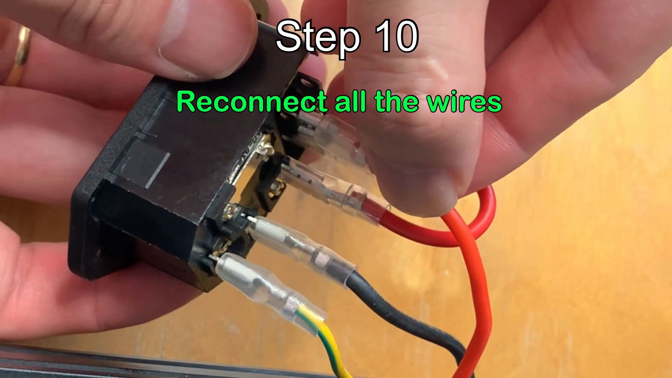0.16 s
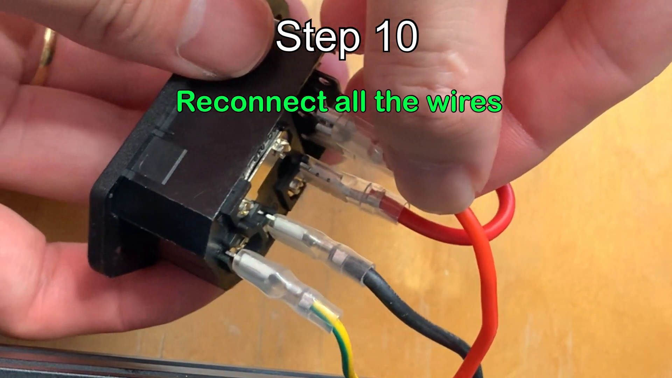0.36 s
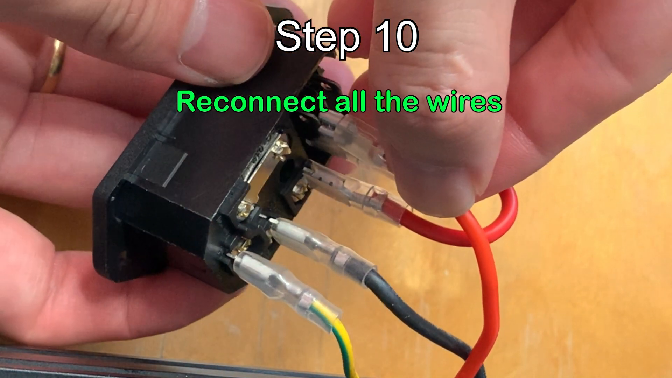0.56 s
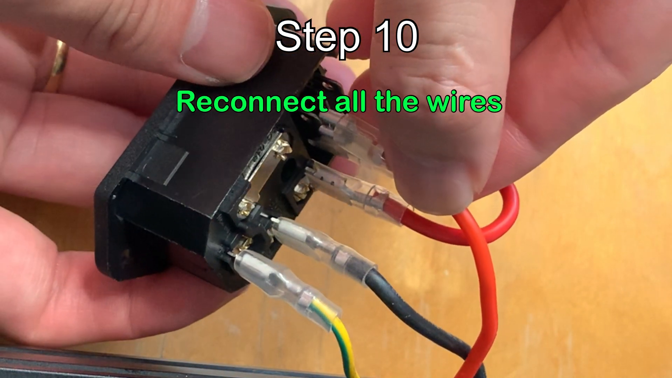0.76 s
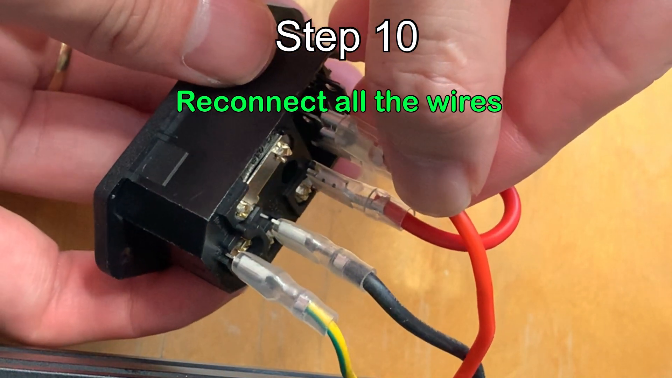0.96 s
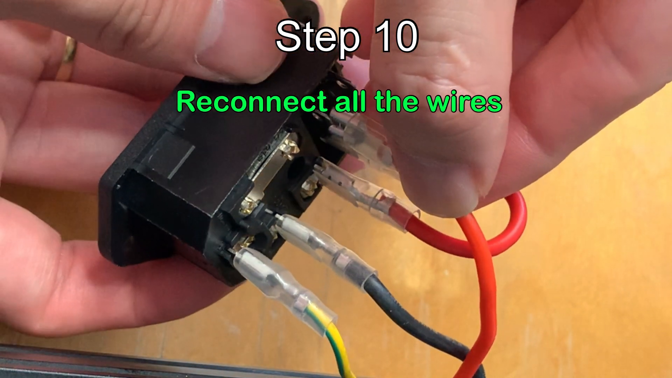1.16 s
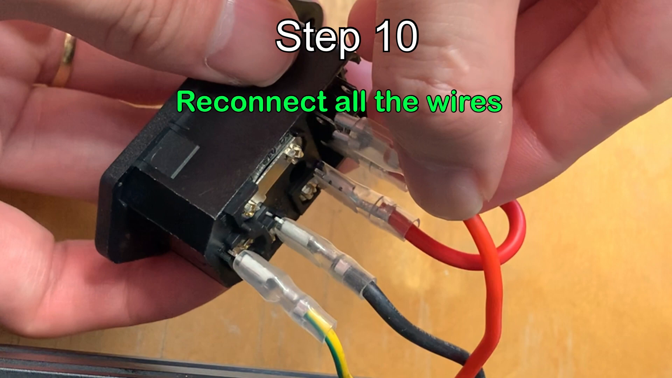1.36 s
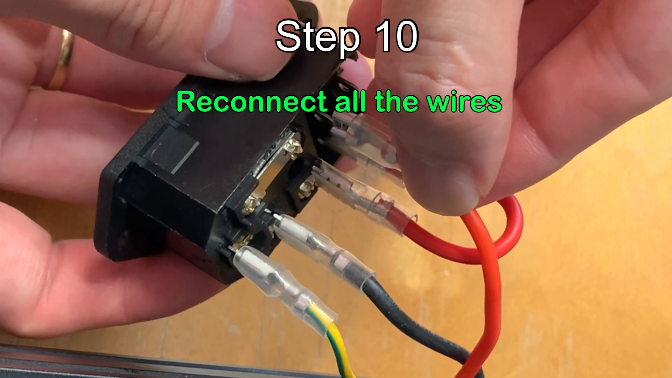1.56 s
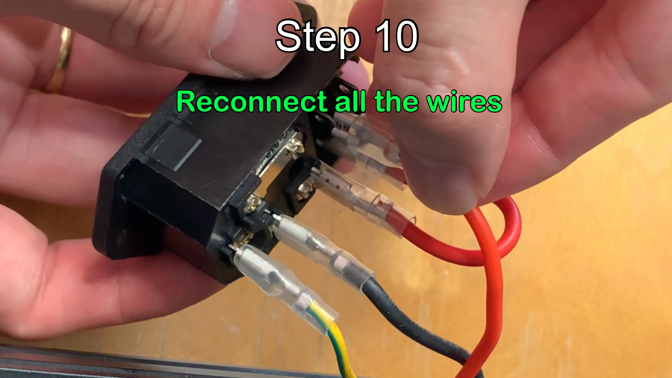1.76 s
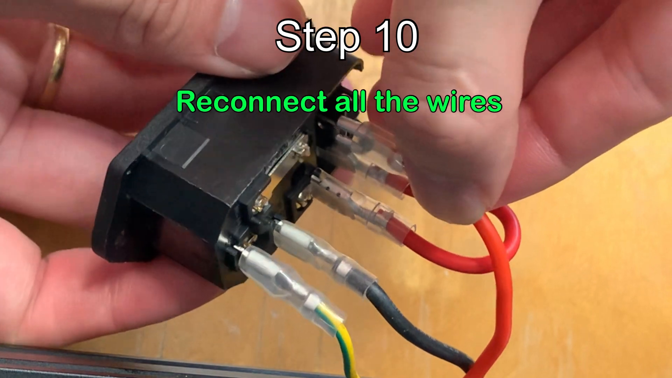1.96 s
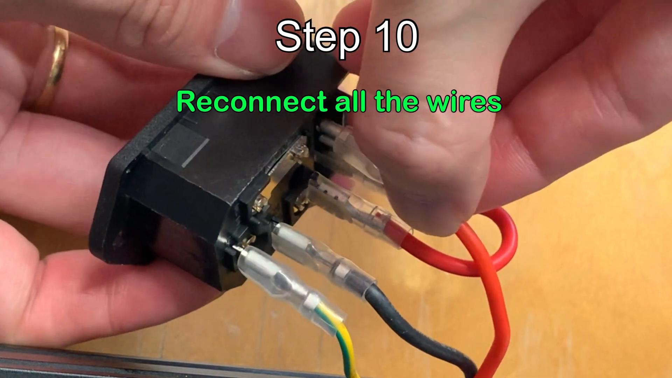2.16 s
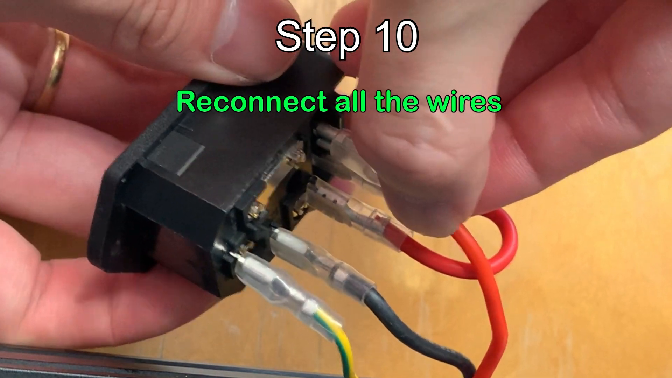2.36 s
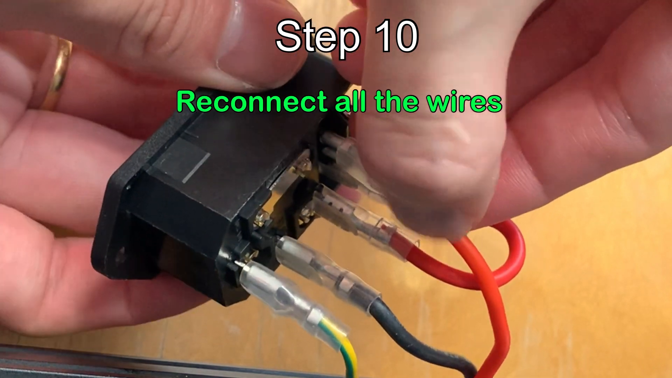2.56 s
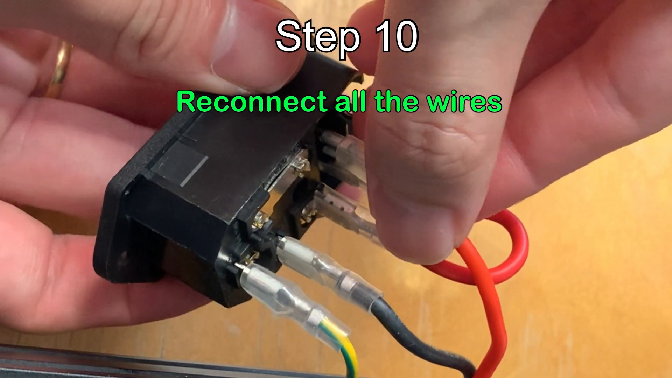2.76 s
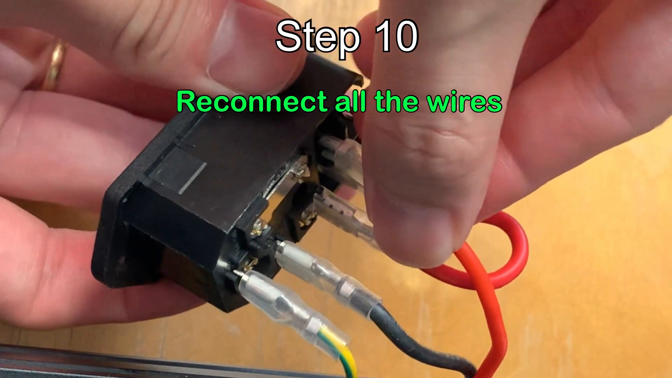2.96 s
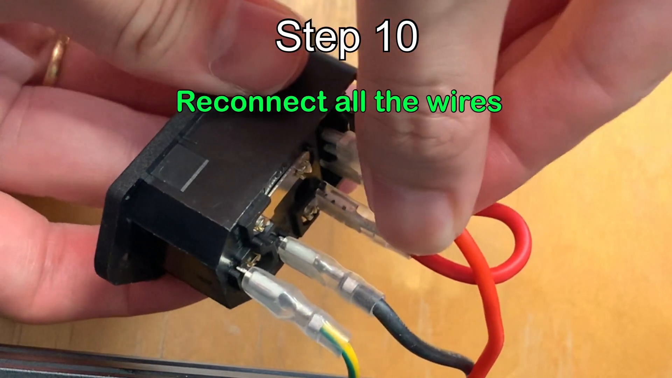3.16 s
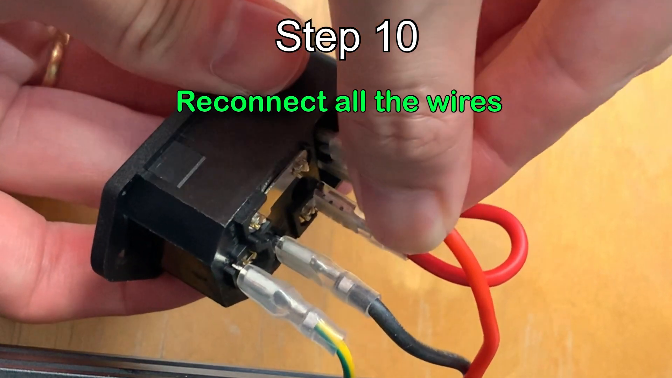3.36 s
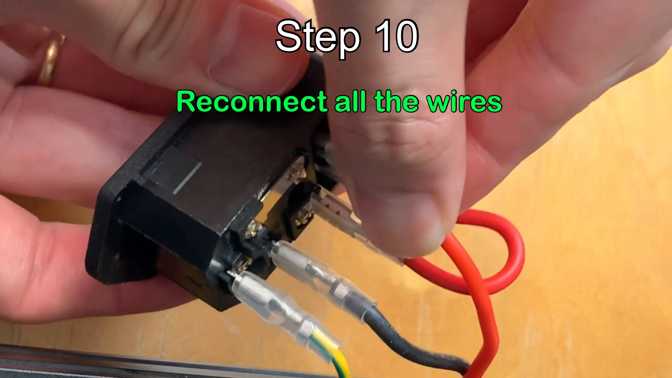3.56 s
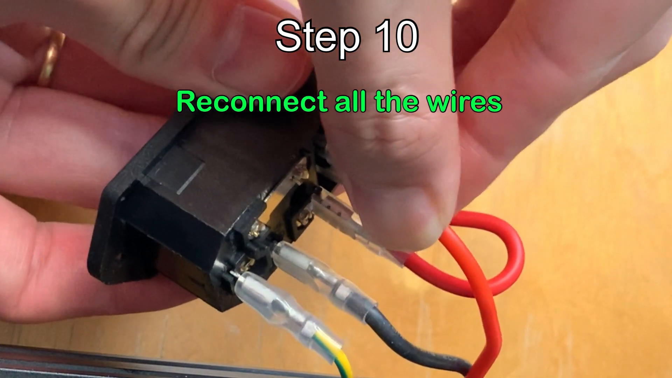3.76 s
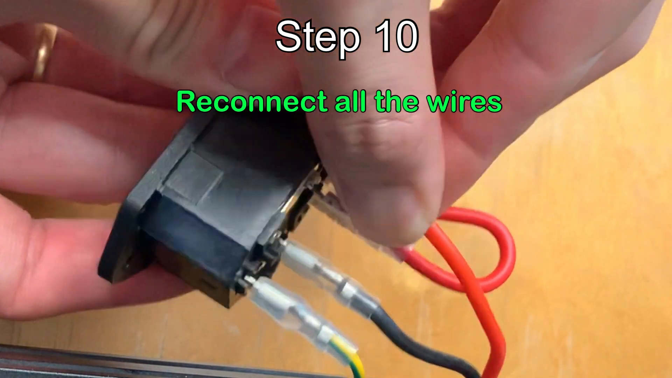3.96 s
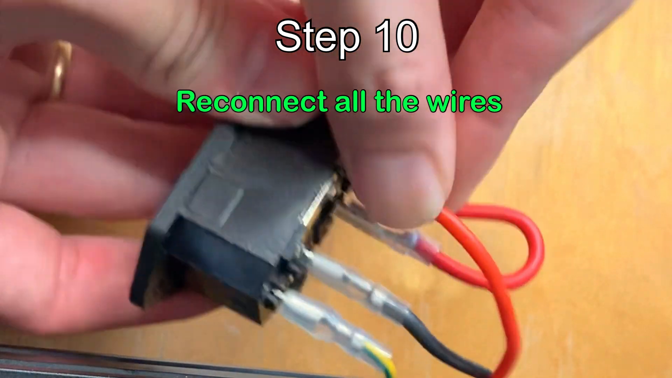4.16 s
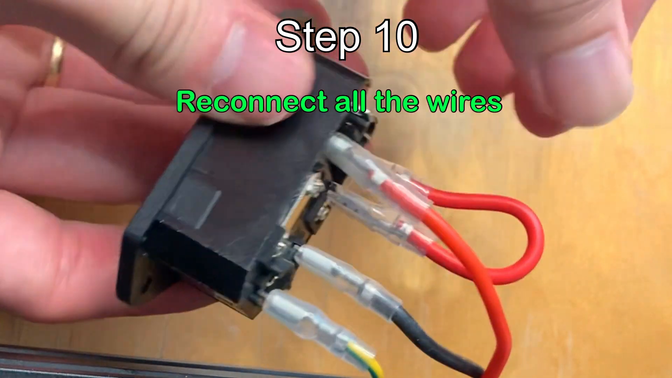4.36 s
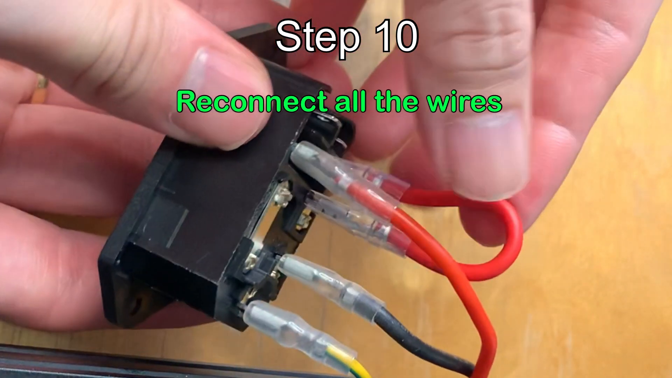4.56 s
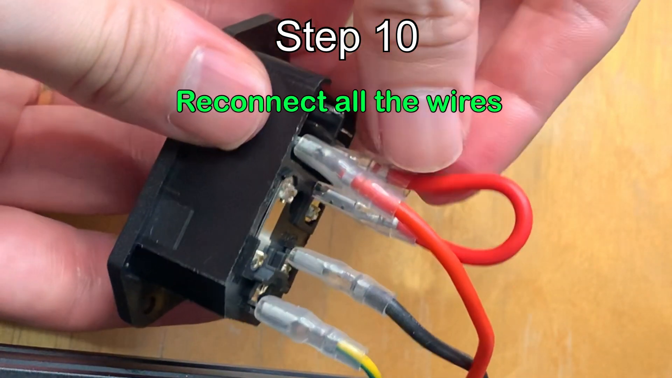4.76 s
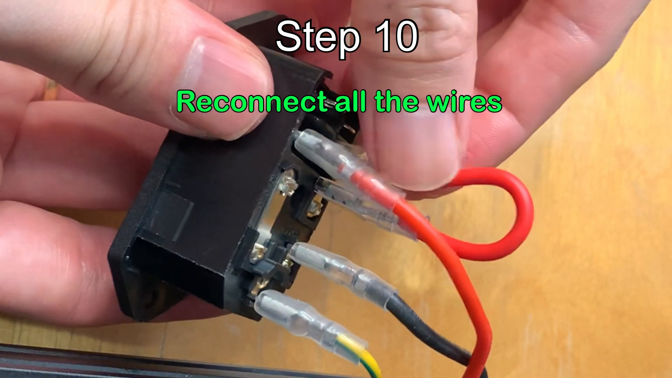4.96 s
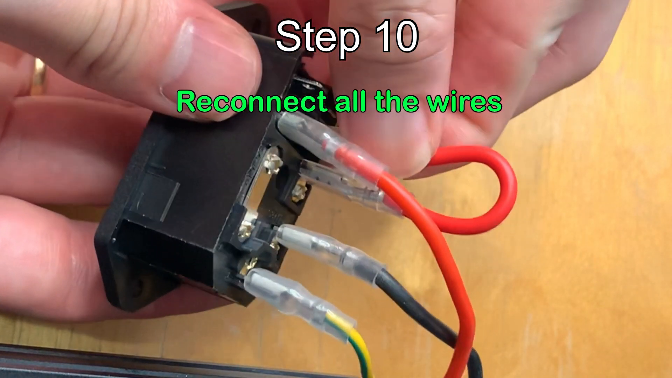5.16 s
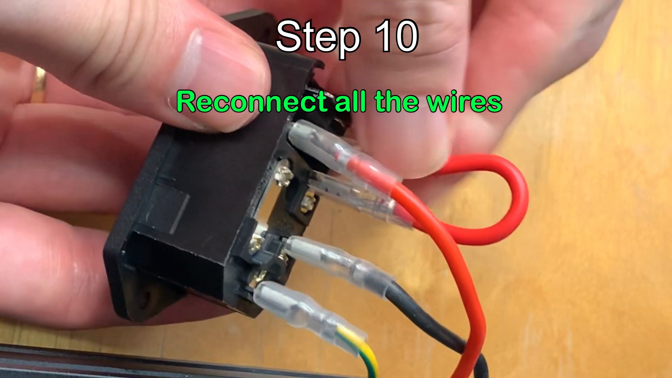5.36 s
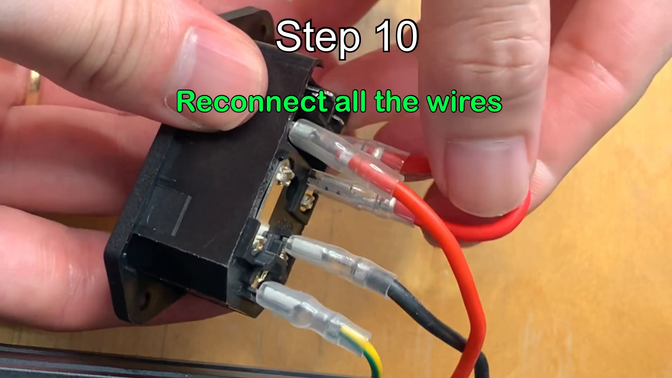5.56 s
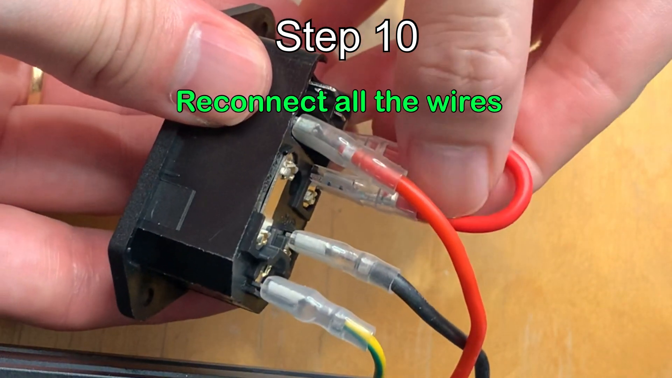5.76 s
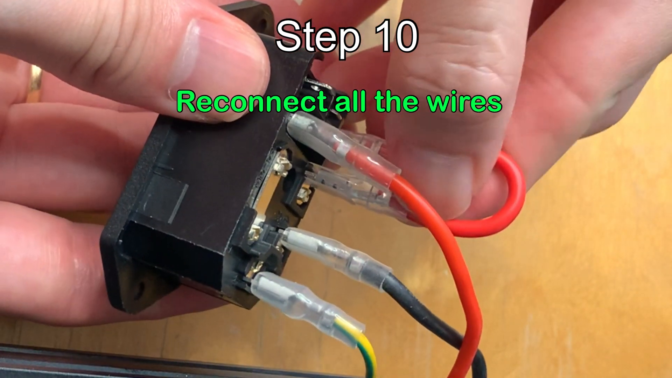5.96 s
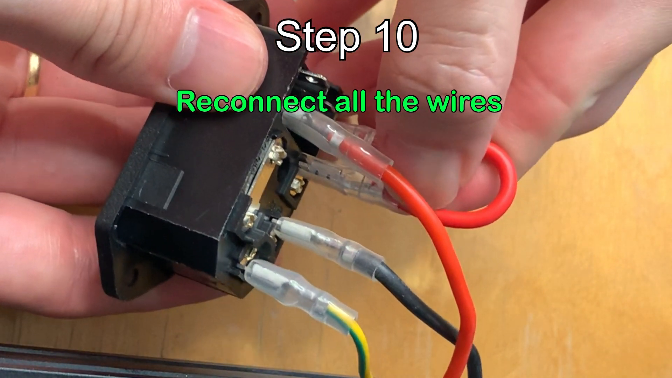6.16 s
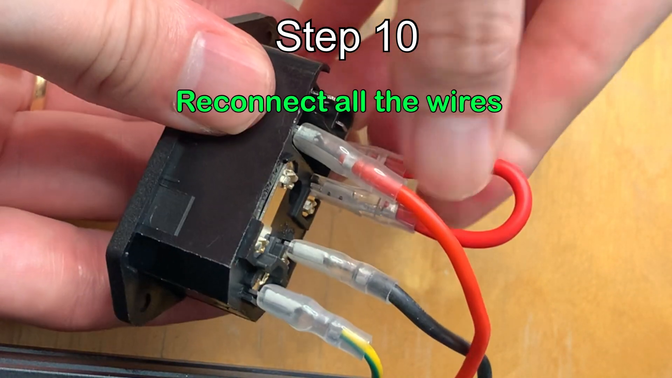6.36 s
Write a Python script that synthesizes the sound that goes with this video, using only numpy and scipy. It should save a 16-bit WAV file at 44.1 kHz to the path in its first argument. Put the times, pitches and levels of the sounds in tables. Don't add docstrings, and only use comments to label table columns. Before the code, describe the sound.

Throughout about 6.5 seconds, a fan and compressor drone low and steady in a small room, wavering slightly, with soft rushing air. Close to the stereo microphones, fingers work metal connectors onto a plastic socket. Barely audible dull knocks come at 0.35 and 1.15 seconds. A crisp small click sounds at 1.87, another with a slight scrape at 2.0, then a metallic tick at 2.93 and a faint plastic one at 3.35. At about 3.88 a connector springs over its catch: one very loud, hard, bright snap, a rattle too quick to separate, ringing metal and plastic with a short room tail. Small ticks follow at 4.1 to 4.6, with soft skin rubbing around 4.75. A tight cluster of plastic and metal taps comes at 5.3, a tick at 5.41, then a light metallic click at 5.83 and faint rubs and ticks to the end.

```python
import sys
import numpy as np
from scipy import signal
from scipy.fft import rfft, irfft, next_fast_len
from scipy.io import wavfile
from scipy.ndimage import uniform_filter1d

SR = 44100
rng = np.random.default_rng(int(sys.argv[2]) if len(sys.argv) > 2 else 0)


def log_audio(samples):
    frames = np.atleast_2d(samples).T
    limited = np.clip(frames, -1, 1)
    pcm = np.round(limited * 32767).astype(np.int16)
    wavfile.write(sys.argv[1], SR, pcm)


def field_ratio(decibels):
    return 10 ** (np.asarray(decibels, dtype=float) / 20)


N = 281799
M = next_fast_len(N)
HZ = np.arange(M // 2 + 1) * SR / M + 1e-3

# hz, likeness (0-1), left_minus_right_db
PORTS = [(60, 1, 0), (169, 0.94, -1), (287, .8, -2.5), (605, 0.15, -2), (1000, 0.03, 0), (2420, .5, -.5),
         (4500, 0.94, 0), (6980, 0.98, 2)]


def read(table, column=1):
    table = np.array(table)
    return np.interp(np.log(HZ), np.log(table[:, 0]), table[:, column])


def walk(rate):
    hold = int(SR / rate)
    steps = np.repeat(rng.standard_normal(N // hold + 1), hold)
    return 1.3 * uniform_filter1d(uniform_filter1d(steps, hold), hold)[:N]


def fade(t60, length_s=.05):
    t = np.arange(int(length_s * SR)) / SR
    return t, np.exp(-np.log(1000) * t / t60)


def bandpass(x, low_hz, high_hz, order=2):
    return signal.sosfilt(signal.butter(order, [low_hz, high_hz], "band", fs=SR, output="sos"), x)


def crack(t60, low_hz, top_hz):
    t, decay = fade(t60)
    burst = bandpass(decay * rng.standard_normal(len(t)), low_hz, top_hz, order=4)
    return burst / np.sqrt(np.sum(burst ** 2) / (.004 * SR))


def pan(x, db):
    return np.array([x * field_ratio(db / 2), x * field_ratio(-db / 2)])


def both(shared, left, right):
    return shared + .25 * np.array([left, right])


def pair(shared, left, right):
    share = np.clip(read(PORTS), 0, 1)
    return np.sqrt(share) * shared + np.sqrt(1 - share) * np.array([left, right])


def add(out, x, start_s):
    i = int(start_s * SR)
    out[:, i:i + x.shape[1]] += x[:, :N - i]


def snap():
    # start_s, metal_db, socket_db
    blows = [(3.8740, -32.5, -40), (3.8747, -25, -32), (3.8757, -14, -22), (3.8761, -8, -14),
             (3.8766, -4, -3.5), (3.8780, -16, -25), (3.8790, -15, -22), (3.8799, -15, -9),
             (3.8815, -20, -16), (3.8860, -24, -30), (3.8888, -27.5, -30)]
    # hz, level_db, t60_s
    socket = [(235, -37, .05), (310, -42, .05), (430, -44, .037), (595, -40, .06), (755, -35, .045),
              (940, -35, .055), (1090, -40, .04), (1395, -35, .04), (1590, -45, .09), (1760, -17, .024),
              (2040, -25, .022), (2500, -20, .01), (2760, -33, .012), (3050, -30, .01)]
    # hz, level_db, t60_s
    connector = [(3560, -15, .006), (3850, -9, 0.0075), (4200, 0, 0.0062), (5870, -11, 0.004),
                 (6500, -8, 0.0051), (6940, -4, 0.0055), (7350, 0, 0.0051), (8050, 0, 0.0055),
                 (8900, -3, 0.0052), (9730, 1, 0.0044), (10800, -6, .004), (11360, -1.5, 0.0049),
                 (12200, -3, 0.004), (13100, -6, .004), (13700, -7, .005), (14460, -17, .005)]
    crack_db, thud_db, scatter_db = -21, -47, 1
    rise_s, phase_spread = 0.0004, 1.2
    out = np.zeros((2, N))
    for start_s, metal_db, socket_db in blows:
        chance = rng.standard_normal((len(socket + connector), 2))
        add(out, pan(field_ratio(metal_db + crack_db) * crack(0.011, 2500, 18000), 0), start_s + rise_s)
        add(out, pan(field_ratio(socket_db + thud_db) * crack(0.063, 223, 1297), 0), start_s + rise_s)
        for (hz, mode_db, t60), (luck, turn) in zip(socket + connector, chance):
            t, decay = fade(t60)
            rise = (1 - np.exp(-t / rise_s)) ** 2
            ring = decay * rise * np.sin(2 * np.pi * hz * (t - 2 * rise_s) + phase_spread * turn)
            blow_db = socket_db if hz < 3300 else metal_db
            pan_db = -5 if 1100 < hz < 2900 else 0
            add(out, pan(field_ratio(blow_db + mode_db + scatter_db * luck) * ring, pan_db), start_s)
    return out


def ticks():
    # start_s, ring_db, ring_hz, crack_db, crack_top_hz
    metal = [(1.8718, -42, 8960, -56, 11800), (1.8720, -58, 15000, -63, 16000),
             (1.938, -68, 9000, -75, 10000), (1.968, -66, 9000, -73, 12000), (1.993, -59, 9100, -69, 10000),
             (2.0100, -48, 8800, -59, 12000), (2.301, -75, 9000, -74, 15000),
             (2.935, -41, 9200, -63, 11000), (4.1005, -67, 8700, -65, 15500),
             (4.148, -60, 15400, -66, 15800), (5.296, -55, 8600, -65, 16000),
             (5.297, -57, 14800, -80, 16000), (5.317, -62, 12700, -70, 16000),
             (5.323, -64, 6300, -71, 16000), (5.331, -53, 9750, -70, 15000),
             (5.333, -60, 10600, -76, 15000), (5.409, -73, 9000, -76, 9000),
             (5.835, -47, 9150, -68.5, 11000), (5.988, -68, 8800, -74, 10000),
             (6.066, -60, 8900, -84, 10000), (6.197, -80, 12000, -72, 15000)]
    # start_s, ring_db, ring_hz, crack_db
    plastic = [(1.8685, -59, 2830, -70), (1.872, -49, 4700, -58), (1.872, -51, 5600, -70),
               (2.0095, -53, 4750, -66), (2.9235, -62, 3100, -67), (2.934, -47, 6400, -59),
               (2.934, -48, 5500, -70), (3.351, -57, 4200, -68), (4.397, -62, 2500, -69),
               (4.460, -58, 4200, -61), (4.598, -67, 5900, -76), (5.247, -56, 4220, -74),
               (5.296, -43, 2444, -56), (5.297, -52, 1450, -64), (5.297, -56, 4300, -70),
               (5.298, -63, 620, -70), (5.305, -64, 1500, -64), (5.313, -62, 3300, -65),
               (5.322, -60, 4700, -64), (5.330, -37, 1777, -58), (5.331, -54, 3250, -70),
               (5.332, -55, 4200, -70), (5.332, -61, 550, -70), (5.337, -58, 3300, -66),
               (6.178, -53, 4200, -70), (6.233, -59, 1618, -68)]
    # start_s, ring_db,
    # ring_hz
    knocks = [(1.871, -46, 6620), (2.010, -51, 6730), (1.156, -59, 1085), (.347, -58, 920),
              (.376, -59, 890), (1.157, -54, 964), (2.936, -56, 4570), (3.821, -62, 956),
              (4.148, -56, 4800), (4.147, -59, 3100), (5.409, -55, 4750), (5.959, -66, 2180)]
    ring_1k_s, ring_slope, shortest_ring_s = 0.068, 0.9, 0.013
    rough, rise_s, crack_s = 0.28, 0.00035, 0.0061
    out = np.zeros((2, N))
    for start_s, ring_db, hz, *_ in metal + plastic + knocks:
        t60 = max(ring_1k_s * (1000 / hz) ** ring_slope, shortest_ring_s)
        t, decay = fade(t60, length_s=.15)
        wobble = 1 + rough * 5 * uniform_filter1d(rng.standard_normal(len(t)), size=24)
        lead = 2.0 if start_s > 5.2 and 1200 < hz < 3500 else 0
        ring = np.sin(2 * np.pi * hz * t + lead * np.array([[0], [1]]))
        add(out, field_ratio(ring_db) * ring * decay * wobble * (1 - np.exp(-t / rise_s)), start_s)
    for start_s, _, _, crack_db, top_hz in metal:
        cracks = [crack(crack_s, 2500, top_hz) for _ in range(3)]
        add(out, field_ratio(crack_db) * both(*cracks), start_s)
    for start_s, _, _, crack_db in plastic:
        cracks = [crack(crack_s, 350, 3300) for _ in range(3)]
        add(out, field_ratio(crack_db) * both(*cracks), start_s)
    return out


def rubs():
    # middle_s, length_s, level_db, centre_hz, width_hz
    slides = [(1.891, .045, -80, 6000, 3400), (2.002, .03, -68, 6600, 1400),
              (2.006, .025, -74, 11000, 3000), (2.004, .05, -71, 4000, 3500), (1.996, .07, -77, 9150, 300),
              (2.702, .04, -78, 3800, 1700), (2.93, .047, -72, 3900, 6000), (3.872, .016, -41, 6500, 6000),
              (4.155, .05, -75, 4700, 1500), (4.427, .048, -68.5, 3700, 120), (4.47, .08, -70, 2200, 2600),
              (4.762, .04, -77, 6000, 1200), (4.755, .078, -80.5, 12500, 5000),
              (4.749, .9, -76, 1670, 1900), (4.75, .7, -84, 4300, 500), (6.1, .46, -81, 4300, 600),
              (5.323, .03, -72, 8500, 12000), (5.321, .021, -70, 5900, 1500),
              (5.341, .026, -69, 3300, 1500), (5.42, .02, -81, 6700, 1000), (5.45, .13, -72, 1950, 500),
              (5.42, .12, -79, 4700, 900), (5.7, .17, -78.5, 3100, 260), (6.232, .13, -73, 2820, 2300)]
    out = np.zeros((2, N))
    grain = field_ratio(3 * walk(250))
    for middle_s, length_s, db, hz, width_hz in slides:
        t = np.arange(-8192, 8192) / SR
        grit = both(*rng.standard_normal((3, len(t))))
        band = bandpass(grit, max(hz - width_hz / 2, 100), hz + width_hz / 2)
        swell = np.exp(-(2 * t / length_s) ** 2)
        add(out, field_ratio(db) * band / band.std() * swell, middle_s + t[0])
    return out * grain


def room(x):
    # hz, level_db, t60_s
    bands = [(300, -62.5, .2), (800, -56, 0.17), (1510, -51, 0.26), (2400, -57, .24), (4600, -46, .27),
             (7000, -50, 0.34), (9800, -41, .29), (15000, -62, .17)]
    gap_s, end_s, wall_top_hz = 0.0037, .2, 11500
    tail = np.zeros((3, N))
    for hz, db, t60 in bands:
        t, decay = fade(t60, length_s=.4)
        octave = bandpass(rng.standard_normal((3, len(t))), hz / np.sqrt(2), hz * np.sqrt(2))
        add(tail, field_ratio(db + 8.5) * decay * np.exp(-(t / end_s) ** 4) * octave, gap_s)
    walls = 1 / (1 + (HZ / wall_top_hz) ** 4)
    return irfft(pair(*rfft(tail, M)) * rfft(x.mean(axis=0), M) * walls, M)[:, :N]


def machines():
    # hz, level_db, wander_db, wander_rate (per s), left_minus_right_db, left_lead (radians)
    motor = [(57.9, -65, 4.5, 3, -0.5, 0), (118.5, -64.5, 3, 5, 0.5, 0),
             (174.04, -44.5, .5, 3.97, -0.76, 0.07), (238.9, -64, 3, 6.8, -1, 0.05),
             (356.3, -77, 2, 3, -6.5, -0.2), (473.4, -74.5, 3, 7.8, -4.5, 0), (647, -84, 2, 3.98, -3, 3),
             (1102, -84, 5, 4.6, -3.5, 2.5), (1160, -75.5, 4, 17, -6.5, 0.78),
             (1587.5, -86.5, 3.5, 5.8, -2.5, 1.3), (1690, -89.5, 2, 6.5, 2, 2),
             (1728, -85.5, 4.5, 8.7, -3.5, 0), (3133, -87.5, 4, 16, -2, 0.5), (3163, -93.5, 5, 13, -2, -1)]
    # hz, level (dB per Hz)
    air_curve = [(18, -92), (30, -90), (50, -73), (150, -75.5), (215, -85), (260, -80), (400, -90.5),
                 (600, -94), (850, -100.5), (1700, -102), (2100, -110.5), (4200, -114.5), (4600, -118.5),
                 (14500, -127), (15300, -139)]
    t = np.arange(N) / SR
    side = np.array([[.5], [-.5]])
    tones = np.zeros((2, N))
    for hz, db, wander_db, rate, pan_db, lead in motor:
        swing = np.sin(2 * np.pi * (hz * t + rng.random()) + side * lead)
        level_db = db + wander_db * np.minimum(walk(rate), .8) + side * pan_db
        tones += np.sqrt(2) * field_ratio(level_db) * swing
    white = rfft(rng.standard_normal((3, M))) * np.sqrt(SR / 2)
    air_db = read(air_curve) + side * read(PORTS, column=2)
    air = irfft(pair(*white) * field_ratio(air_db), M)[:, :N]
    return tones + air * field_ratio(0.45 * walk(2.1))


def scene():
    echo_db, shade_db = -1.5, -5.5
    click = snap()
    fingers = ticks() + rubs()
    pulse = np.zeros(N)
    pulse[np.argmax(click[0])] = field_ratio(echo_db) * np.sqrt(np.sum(click[0] ** 2))
    scatter, scatter_s = 2.5, .0004
    blur = (1 + scatter * walk(1 / scatter_s)) / np.hypot(1, scatter)
    return click + fingers + room(pulse + field_ratio(shade_db) * fingers * blur) + machines()


def band_limit(x):
    return signal.sosfilt(signal.butter(12, 16440, fs=SR, output="sos"), x)


def record(dry):
    # hz, lead (radians)
    lead_curve = [(55, 0), (180, 0.11), (500, -0.03), (1000, 0), (1800, .5), (2300, 1.79), (3200, 1.17),
                  (4720, 3.1)]
    lag_s, top_hz, top_width_hz = .00024, 15650, 380
    lead = np.interp(np.log(HZ), np.log(np.array(lead_curve)[:, 0]), np.array(lead_curve)[:, 1])
    lead += 2 * np.pi * lag_s * np.maximum(HZ - lead_curve[-1][0], 0)
    top = 1 / (1 + np.exp(np.minimum((HZ - top_hz) / top_width_hz * 2, 50)))
    ports = rfft(dry, M) * top * np.exp(-1j * np.array([0 * lead, lead]))
    return band_limit(irfft(ports, M)[:, :N])


dry = scene()
out = record(dry)
log_audio(out)
```